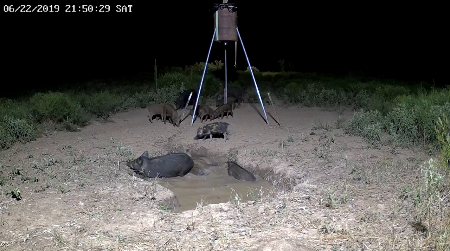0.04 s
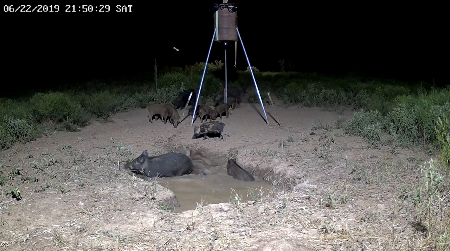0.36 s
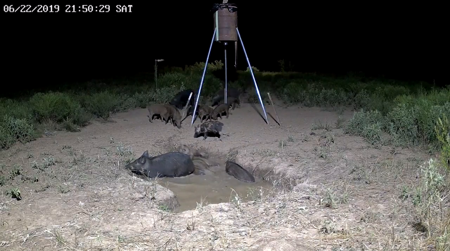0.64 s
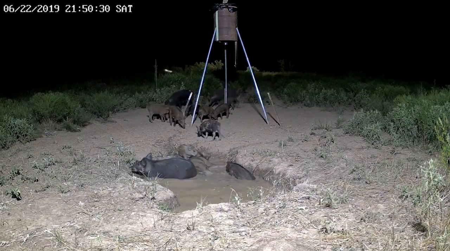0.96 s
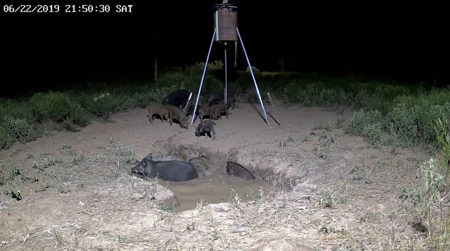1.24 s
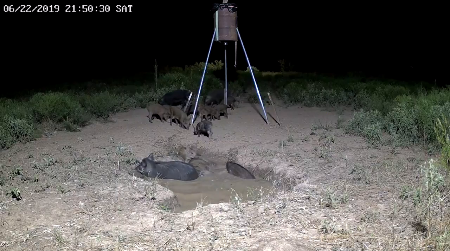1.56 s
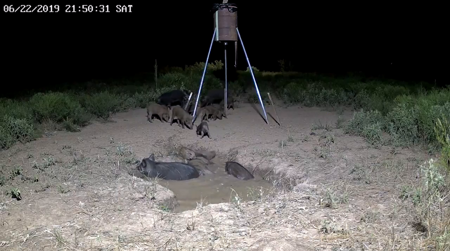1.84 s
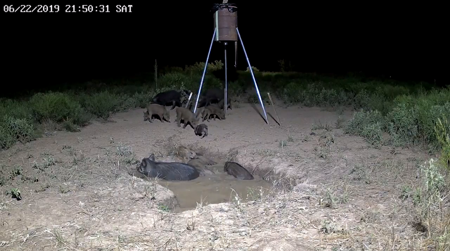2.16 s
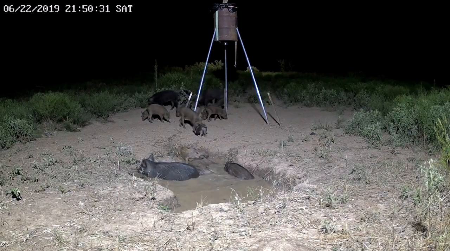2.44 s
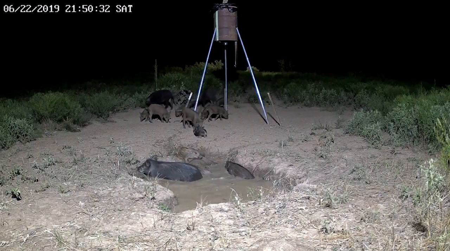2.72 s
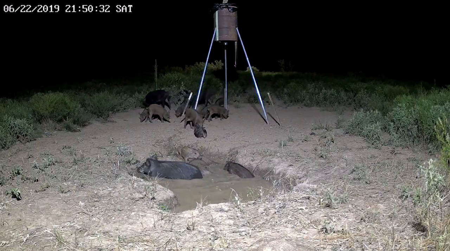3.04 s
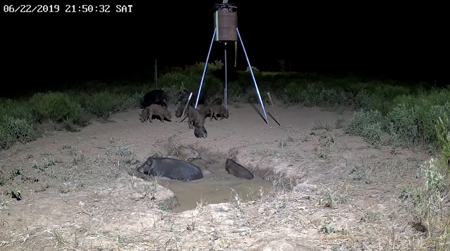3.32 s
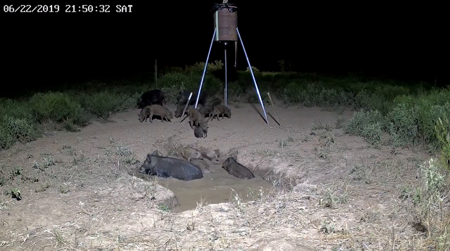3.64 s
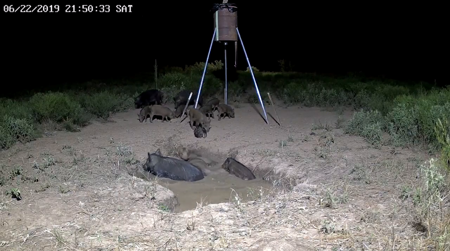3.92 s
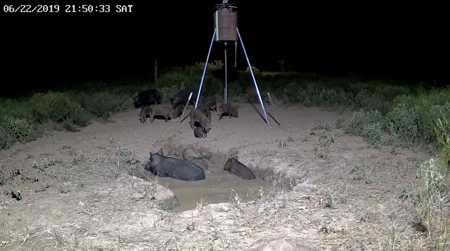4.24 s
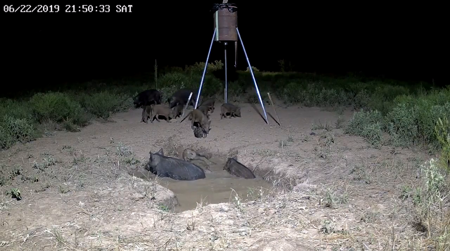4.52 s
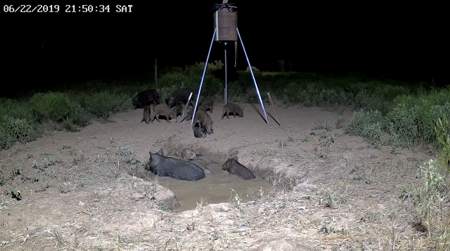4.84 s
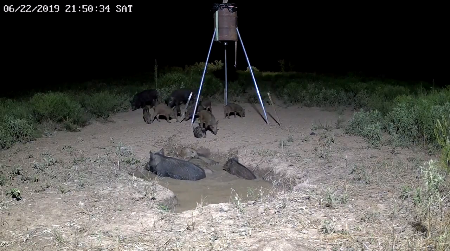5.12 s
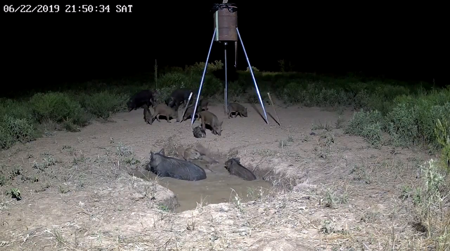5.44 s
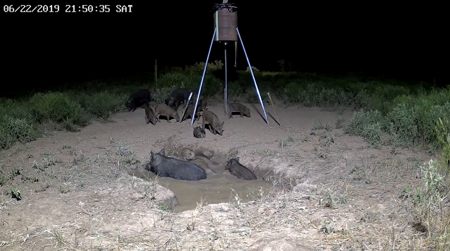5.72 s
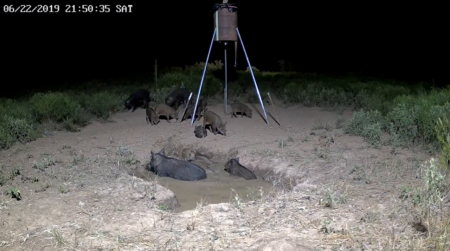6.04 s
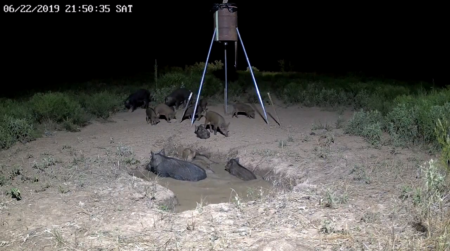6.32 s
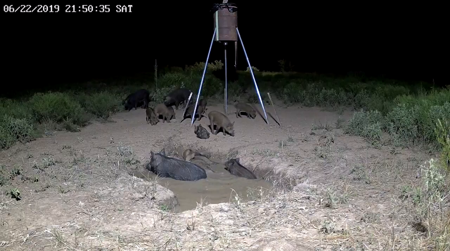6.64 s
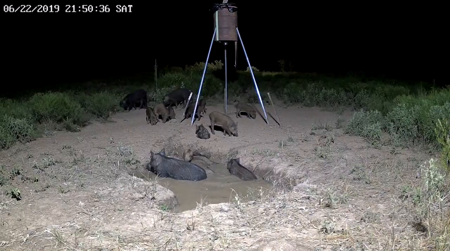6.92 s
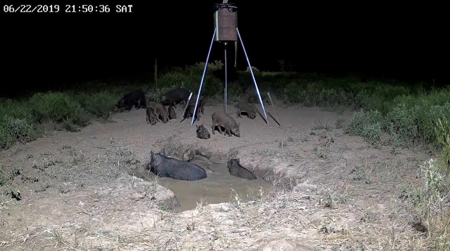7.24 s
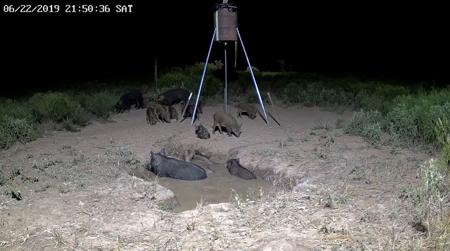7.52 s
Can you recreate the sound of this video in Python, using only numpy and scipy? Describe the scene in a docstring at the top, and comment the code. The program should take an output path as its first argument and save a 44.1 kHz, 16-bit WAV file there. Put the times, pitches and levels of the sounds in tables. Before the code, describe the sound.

Over a faint, steady hiss of night insects, wild pigs bump and scuff on the ground and grunt softly. A pig then shifts in a mud hole, making squelches, bubbles and two short bouts of splashing, as feed snaps between teeth and light gusts buffet the small outdoor microphone. Things settle, and a clearer low grunt is followed by a softer one.

```python
"""Under a feeder at night, wild pigs feed and wallow, heard by a small outdoor camera.
Insects hiss all round; puffs of breeze stir the brush and buffet the microphone.
Snouts and hooves knock, feed cracks between teeth, and grunts pulse through ringing throats.
In the mud hole, air pockets squelch and bubble, and thrown water falls back as drops and fizz."""
import sys
import numpy as np
from scipy import signal
from scipy.fft import rfft, irfft
from scipy.io import wavfile
from scipy.ndimage import uniform_filter1d

SR = 44100
rng = np.random.default_rng(int(sys.argv[2]) if len(sys.argv) > 2 else 0)


def transcribe(u):
    """Save the signal u as a 16-bit wav file named by the first command-line argument.

    u: samples, shape (n,) or (channels, n), limited to [-1, 1]; the rate is SR.
    q: integer samples, one column per channel.
    """
    v = np.clip(np.atleast_2d(u).T, -1, 1)
    q = np.round(v * 32767).astype(np.int16)
    wavfile.write(sys.argv[1], SR, q)


N = 342657
TIME = np.arange(N) / SR
LEAD_S = .03  # margin round each short sound


def from_db(db):
    return 10 ** (np.asarray(db) / 20)


def unit_rms(x):
    return x / np.sqrt(np.mean(x ** 2) + 1e-20)


def add(mix, start_s, sound):
    """Mixes a sound in at start_s."""
    part = mix[max(round(start_s * SR), 0):][:len(sound)]
    part += sound[:len(part)]


def colour(x, eq):
    """Shapes x with an EQ of (freq_hz, gain_db) points, at rms 1."""
    hz, db = np.transpose(eq)
    bins = np.fft.rfftfreq(len(x), 1 / SR) + 1
    octaves_outside = np.maximum(np.log2(bins / hz[-1]), 0) + np.maximum(np.log2(hz[0] / bins), 0)
    gain_db = np.interp(np.log(bins), np.log(hz), db) - 30 * octaves_outside
    return unit_rms(irfft(rfft(x) * from_db(gain_db), len(x)))


def butterworth(x, order, hz, kind):
    return signal.sosfilt(signal.butter(order, hz, kind, fs=SR, output="sos"), x)


def drift(per_s):
    """Slow random wander of rms 1."""
    knots = rng.standard_normal(4000)
    return unit_rms(np.interp(TIME * per_s, np.arange(len(knots)), knots))


def grains(per_s, spread_db):
    """Random tiny impacts of uneven size."""
    impacts = rng.standard_normal(N) * (rng.random(N) < per_s / SR)
    return impacts * from_db(spread_db * np.minimum(rng.exponential(1, N), 3.5))


def swell_db(start_s, hold_s, rise_s, fall_s):
    """Attack, hold and release, topping out at 0 dB; rise and fall are the times taken for 20 dB."""
    before, after = np.maximum(start_s - TIME, 0), np.maximum(TIME - start_s - hold_s, 0)
    return -20 * (before / rise_s + after / fall_s)


def power_sum(curves_db):
    """Gain of several dB curves whose powers add."""
    return np.sqrt(sum(from_db(db) ** 2 for db in curves_db))


def turbulence(eq):
    """Low noise whose own swells are levelled."""
    swirl = signal.hilbert(colour(rng.standard_normal(N), eq))
    envelope = np.sqrt(uniform_filter1d(abs(swirl) ** 2, 2200) + 1e-9)
    return unit_rms(swirl.real / envelope)


# sub rumble of slow air: freq_hz, gain_db
CALM_EQ = [(8, 15), (25, 0.5), (60, -10), (110, -19.5), (200, -40)]
# flutter of gusting air: freq_hz, gain_db
GUST_EQ = [(20, -16), (56, 5), (85, -8), (120, -11.5), (170, -23.5), (300, -35.5)]
# puffs of breeze on microphone and brush: peak_s, rumble_db, rise_s, fall_s, hiss_db
GUSTS = [(0.42, -60, 0.54, 0.25, -60.5), (1.032, -47.5, 0.36, 0.18, -58.5), (2.65, -46, 0.13, 0.31, -58),
         (3.379, -35.5, 0.081, 0.69, -52), (4.002, -30, 0.15, 0.23, -54.5), (4.503, -54.5, 0.71, 1, -72.5),
         (5.099, -30, 0.19, 0.13, -53), (5.482, -35, 0.2, 0.36, -54.5), (5.719, -39.5, 0.1, 0.25, -57),
         (7.552, -41, 0.27, 0.52, -57)]
# the hardest eddies: middle_s, level_db, half_length_s, flutter_hz
EDDIES = [(0.887, -34, 0.007, 58), (2.629, -30, 0.0086, 57.5), (3.33, -33.5, 0.0092, 61.5),
          (3.368, -35, 0.0078, 69), (3.426, -25.5, 0.0082, 74), (3.488, -29, 0.0081, 59),
          (3.62, -31, 0.02, 57), (3.838, -31, 0.017, 54), (3.981, -16, 0.0063, 64.5),
          (4.924, -30, 0.0047, 61.6), (5.055, -20.5, 0.0042, 89.6), (5.076, -16, 0.012, 57.4),
          (5.151, -25.5, 0.014, 51), (5.648, -28, 0.0084, 56), (5.74, -21, 0.0075, 61)]
def wind(still_db=-65.5, crossover_db=-50, slowing_per_s=7):
    """Slow air sways the diaphragm; gusts flutter faster, and single eddies slow as they pass."""
    puffs = [db + swell_db(s, 0, rise, fall) for s, db, rise, fall, _ in GUSTS]
    strength = power_sum([still_db] + puffs)
    gusty = strength / (strength + from_db(crossover_db))
    out = strength * (gusty * turbulence(GUST_EQ) + from_db(7) * (1 - gusty) * turbulence(CALM_EQ))
    t = np.arange(-2500, 2500) / SR
    for s, db, half_s, hz in EDDIES:
        envelope = from_db(db) * np.exp(-.5 * (t / half_s) ** 2)
        cycles = hz * t * (1 - slowing_per_s * t / 2) + rng.random()
        add(out, s + t[0], envelope * np.sin(2 * np.pi * cycles))
    return out


# airy bed of brush and far insects: freq_hz, gain_db
HISS_EQ = [(150, -5.5), (500, -8.5), (900, -25), (1200, -21), (1650, -7), (2550, 0.5), (2900, -1.5),
           (3700, -3.5), (4100, 1.5), (5300, -0.5), (6200, -8), (7100, -17.5), (8000, -38)]
# insect chorus bands: centre_hz, half_width_hz, relative_db
INSECT_BANDS = [(3196, 170, -8.5), (4344, 190, -8.5), (4380, 82, -13.5)]
def brush_and_insects(still_db=-65.5, lag_s=.034, follow=.37, flicker_db=2):
    """Wide hiss with narrow chorus bands standing out of it; both swell just after each of the GUSTS."""
    stirred = [db + follow * swell_db(s + lag_s, 0, rise, fall) for s, _, rise, fall, db in GUSTS]
    bed_db = 20 * np.log10(power_sum([still_db] + stirred))
    out = from_db(bed_db - 2.25 + flicker_db * drift(40)) * colour(rng.standard_normal(N), HISS_EQ)
    bins = np.fft.rfftfreq(N, 1 / SR)
    for hz, half_width, band_db in INSECT_BANDS:
        band = irfft(rfft(rng.standard_normal(N)) / (1 + ((bins - hz) / half_width) ** 2), N)
        out += from_db(bed_db + band_db) * unit_rms(band)
    return out


def shuffling():
    """The herd shifts about: faint, dull noise that wavers in level."""
    level = from_db(-86 + 3.5 * drift(9))
    return level * colour(rng.standard_normal(N), [(200, 1), (950, 2.5), (1250, -19.5)])


# dark tone of thick mud: freq_hz, gain_db
MUD_EQ = [(150, -19), (260, -3.5), (450, -4), (780, -6.5), (1000, -17), (1800, -19.5)]
def squelch(pops_per_s=160, ring_cycles=2.8):
    """Tiny air pockets of many sizes pop in wet mud, ring briefly and run together into a gurgle."""
    t = np.arange(3500) / SR
    gurgle = 0
    for hz in np.geomspace(200, 2300, 17):
        age = t * hz / ring_cycles
        pop = hz * age * np.exp(-2 * age) * np.sin(2 * np.pi * hz * t)
        gurgle = gurgle + signal.oaconvolve(grains(pops_per_s, spread_db=2), pop)[:N]
    return colour(gurgle, MUD_EQ)


# bright edge of sticky mud and of scraped grit: freq_hz, gain_db
EDGE_EQ = [(900, -31.5), (1300, -2), (1550, 3.5), (2200, -1.5), (2700, -9), (4300, -15.5), (5500, -39)]
# shoves of wet ground: start_s, hold_s, level_db
SLOSHES = [(0.018, 0.12, -54.5), (0.211, 0.012, -53.5), (0.337, 0.16, -51), (2.326, 0.053, -65),
           (3.46, 0.057, -55.5), (3.571, 0.18, -63), (3.946, 0.062, -48), (4.149, 0.064, -42),
           (5.421, 0.056, -49), (5.474, 0.056, -44.5), (5.672, 0.069, -53.5)]
def sloshes(rise_s=.058, fall_s=.13, sticky_db=-11):
    """Mud pushed by snouts and bodies squelches, and crackles as it pulls apart."""
    envelope = power_sum(db + swell_db(s, hold, rise_s, fall_s) for s, hold, db in SLOSHES)
    gurgle = squelch()
    crackle = from_db(sticky_db) * colour(grains(per_s=700, spread_db=2.5), EDGE_EQ)
    return from_db(-4) * envelope * (gurgle + crackle)


# low scuff of a blow: freq_hz, gain_db
SCUFF_EQ = [(70, -19), (160, 7), (260, -1), (520, -3), (800, -8.5), (1000, -10.5), (1200, -40),
            (2000, -59.5)]
# dull knocks of snouts and hooves: hit_s, level_db, pitch_hz, swell_s, edge_db
KNOCKS = [(0.044, -42.5, 288, 0.0071, -22), (0.079, -38, 322, 0.0048, -31), (0.102, -39, 344, 0.0046, -16),
          (0.111, -31.5, 237, 0.002, -42), (0.127, -44, 384, 0.005, -8), (0.2134, -35, 250, 0.0028, -10.5),
          (0.222, -35.5, 618, 0.0043, -8.5), (0.23, -38.5, 290, 0.0027, -6), (0.327, -33, 226, 0.0033, -22),
          (0.379, -34, 288, 0.0036, -15.5), (0.382, -33.5, 251, .009, -33), (0.421, -50, 810, 0.0046, -11),
          (0.434, -44.5, 417, 0.014, -5), (0.469, -33, 494, 0.0046, -5), (0.468, -40.5, 109, 0.0086, -35),
          (0.506, -38.5, 297, 0.0036, -24), (0.588, -49, 267, 0.0077, 1), (0.703, -35, 456, 0.0036, -14),
          (0.7116, -29, 262, 0.0048, -10), (0.7144, -30, 704, 0.0042, -6.5),
          (0.737, -39.5, 423, 0.0025, -15), (1.872, -46, 482, 0.0036, -35), (2.142, -35.5, 522, 0.0027, -9),
          (2.336, -47, 697, 0.0068, -17), (2.356, -45.5, 514, 0.004, -23), (4.162, -36.5, 620, 0.0045, 0),
          (4.166, -19, 340, 0.0021, -11), (4.2264, -37, 547, 0.0024, -33), (7.51, -50, 280, 0.006, -35)]
def knock(db, hz, swell_s, edge_db, body_hz=230, body_decay_s=.013, thud_hz=97):
    """A soft blow rings a hollow body and thuds on the ground; grit scrapes as it lands and after."""
    t = np.arange(7000) / SR - LEAD_S
    since = np.maximum(t, 0)
    age = since / swell_s
    blow = (age * np.exp(1 - age)) ** 2
    tone = blow * np.sin(2 * np.pi * hz * t)
    fade_in = np.minimum(2 + 2 * t / LEAD_S, 1)
    scrape = from_db(-15) * np.exp(np.minimum(t / .028, -t / .034)) * fade_in
    low, high = rng.standard_normal((2, len(t)))
    low = butterworth(low, 2, .63 * hz, "high")  # light blows carry little bass
    grit = .4 * colour(low, SCUFF_EQ) + .58 * from_db(edge_db) * colour(high, EDGE_EQ)
    ring_hz = body_hz * np.exp(.05 * rng.standard_normal())
    ring_envelope = from_db(-11.5) * (1 - np.exp(-age ** 2)) * np.exp(-since / body_decay_s)
    ring = ring_envelope * np.sin(2 * np.pi * ring_hz * t)
    thud = .43 * np.sin(2 * np.pi * thud_hz * since) * np.exp(-since * thud_hz)
    weight = min(body_hz / hz, 1) ** 2
    return from_db(db - 3) * (tone + weight * (ring + thud) + grit * (blow + scrape))


# sharp cracks and smacks, then two bright clicks in the loud grunt: hit_s, level_db, pitch_hz, snap_s
CRACKS = [(0.103, -48, 1460, 0.0059), (0.26, -47, 1780, .002), (0.267, -33, 1820, 0.00088),
          (0.4398, -40, 2100, 0.0011), (1.791, -48, 1770, 0.00094), (2.147, -40, 1850, 0.0017),
          (2.153, -34, 3080, 0.00034), (2.157, -47.5, 4220, 0.0019), (3.836, -26.5, 2470, 0.00059),
          (4.0531, -29, 2570, 0.00094), (4.125, -31.5, 2500, 0.0012), (4.1355, -34, 1850, 0.0014),
          (4.1692, -31, 1840, .0012), (4.3248, -18, 1850, 0.00074), (4.3273, -30, 2460, 0.0014),
          (5.754, -37.5, 2240, 0.00077), (5.993, -49, 1850, 0.0011), (7.081, -48.5, 1654, 0.0023),
          (7.134, -39, 2500, 0.00061)]
def crack(db, hz, snap_s, rise_s=.006, fall_s=.012, grains_per_s=1500):
    """A bright snap rings for a few cycles inside a brief, fine crackle, with no bass."""
    t = np.arange(5000) / SR - LEAD_S
    age = np.maximum(t, 0) / snap_s
    snap = (age * np.exp(1 - age)) ** 2 * np.sin(2 * np.pi * hz * t)
    since_snap = t - 2 * snap_s
    specks = rng.standard_normal(len(t)) * (rng.random(len(t)) < grains_per_s / SR)
    specks = colour(specks, [(1500, -2.5), (2650, 2), (3200, -18.5)])
    crackle = specks * np.exp(np.minimum(since_snap / rise_s, -since_snap / fall_s))
    return from_db(db) * butterworth(snap + from_db(-21) * crackle, 6, 1300, "high")


# small flings of wet mud: middle_s, level_db, centre_hz, length_s
SPLATS = [(0.928, -61.5, 1700, 0.055), (2.228, -66.5, 965, 0.086), (3.388, -55, 1980, 0.19),
          (3.863, -47.5, 2730, 0.039), (3.916, -53, 750, 0.039), (3.922, -46.5, 3700, 0.029),
          (3.989, -39, 730, 0.018), (4.172, -50.5, 4620, 0.068), (5.51, -43.5, 3600, 0.048),
          (5.567, -50, 5450, 0.11), (5.835, -56.5, 617, 0.066)]
def splat(db, hz, length_s):
    """Fine droplets land in a short swell of noise round one pitch."""
    size = round(length_s * SR)
    eq = [(hz / 2, -26), (hz / 1.2, -4), (hz, 0), (hz * 1.3, -8)]
    return from_db(db) * colour(rng.standard_normal(size), eq) * np.hanning(size)


def resonate(x, hz, width_hz):
    """A resonance of gain 1 that follows the curve hz."""
    turn = np.exp(2j * np.pi * np.cumsum(hz) / SR)
    pole = np.exp(-np.pi * width_hz / SR)
    return 2 * (turn * signal.lfilter([1 - pole], [1, -pole], x / turn)).real


# throat resonances: centre_hz, width_hz, gain_db, closing_fade_db
FORMANTS = [(76.5, 56, 7, -3), (169, 55, -1.5, -8.5), (270, 57, 9, 5.5), (486, 123, -6, 1),
            (807, 146, -2, 9.5)]
# low grunts: start_s, end_s, level_db, fall_db, flap_hz, cutoff_hz, jitter_ratio, attack_s
GRUNTS = [(1.488, 1.541, -69, -2, 102, 330, .2, 0.011), (2.478, 2.7, -49.5, 3, 81, 540, .25, 0.035),
          (3.208, 3.322, -48.5, 1.5, 73, 585, .25, 0.042), (7.0275, 7.218, -43, 1, 79.5, 960, .03, .003),
          (7.305, 7.526, -54.5, 8.5, 110, 650, .25, 0.047)]
def grunt(start_s, end_s, db, fall_db, flap_hz, cutoff_hz, jitter, attack_s,
          breath=.47, shimmer_db=2.5, release_s=.019, sag=.08):
    """Uneven flaps, each with a puff of air, ring the throat, which sinks and dulls as the mouth shuts."""
    t = np.arange(round((end_s - start_s + 2 * LEAD_S) * SR)) / SR
    progress = np.minimum(t / (end_s - start_s), 1)
    arch = np.sin(np.pi * progress)
    cycles = np.cumsum(flap_hz * np.exp(jitter * drift(70)[:len(t)])) / SR
    cycles += .08 * arch * drift(45)[:len(t)]  # single flaps come early or late
    flap = np.floor(cycles)
    effort = (1 + .5 * arch) * np.exp(-np.maximum(start_s + t - end_s, 0) / release_s)
    strength = effort * from_db(shimmer_db * arch * drift(82)[:len(t)] - fall_db * progress)
    pulses = np.diff(flap, prepend=-1) * strength
    since_flap = (cycles % 1) / flap_hz
    puffs = strength * np.exp(-since_flap / .007) * rng.standard_normal(len(t))
    drive = (1 - breath) * unit_rms(pulses) + breath * unit_rms(puffs)
    voice = 0
    for hz, width, gain_db, fade_db in FORMANTS:
        weak_flap = .65 / (1 + (hz / 420) ** 2)  # every other flap is softer and duller
        formant = drive * np.where(flap % 2, weak_flap, 1)
        for pass_width in (width, 4 * width):  # a sharp peak, then steep skirts
            formant = resonate(formant, hz * (1 + sag * (.5 - progress)), pass_width)
        voice = voice + from_db(gain_db - fade_db * progress) * formant
    voice = butterworth(voice, 16, cutoff_hz, "low")
    return from_db(db) * unit_rms(voice * np.minimum(t / attack_s, 1))


# bubbles in the mud: start_s, peak_db, start_hz, end_hz, length_s
BUBBLES = [(1.653, -57, 366, 433, 0.048), (2.863, -54, 950, 940, 0.027), (3.603, -50, 330, 700, 0.04),
           (3.677, -49.5, 450, 863, 0.031), (4.03, -27.5, 546, 610, 0.0091), (4.035, -35, 703, 790, 0.016),
           (4.308, -42, 845, 900, 0.015), (4.334, -42.5, 686, 810, 0.016), (5.654, -46.5, 507, 560, 0.016),
           (5.678, -50, 890, 910, 0.018), (5.713, -40.5, 570, 654, 0.019), (5.777, -52.5, 965, 970, 0.013),
           (6.561, -70.5, 516, 550, 0.073), (6.742, -68.5, 950, 980, 0.017)]
def bubble(db, start_hz, end_hz, length_s, wobble=.047, damping=3.6):
    """An air pocket swells and dies away, gliding in pitch as the mud opens or closes over it."""
    progress = np.linspace(0, 1, round(length_s * SR))
    glide_hz = start_hz * (end_hz / start_hz) ** progress
    hz = glide_hz * np.exp(wobble * drift(370)[:len(progress)])
    envelope = progress * (1 - progress) * np.exp(-damping * progress)
    return from_db(db) * envelope / envelope.max() * np.sin(2 * np.pi * np.cumsum(hz) / SR)


# patter of falling drops: freq_hz, gain_db
DROPS_EQ = [(700, -2), (1200, -12.5), (1750, 0), (2600, 0.5), (3100, 1), (4000, -24)]
# bright fizz of spray: freq_hz, gain_db
FIZZ_EQ = [(2500, -18.5), (3300, 7), (4400, 16.5), (5500, 6), (6500, 0.5), (8000, -57)]
# throws of water: start_s, hold_s, level_db, fizz_relative_db, rise_s
SPLASHES = [(3.984, 0.039, -44.5, 5.5, 0.072), (4.14, 0.043, -47, -2.5, 0.16),
            (5.486, 0.076, -43, 2.5, 0.04)]
def splashes(fall_s=.082):
    """Water thrown up by a wallowing pig falls back as drops and fizz."""
    drops_db, fizz_db = [], []
    for s, hold_s, db, relative_db, rise_s in SPLASHES:
        spray_db = db + swell_db(s, hold_s, rise_s, fall_s)
        drops_db.append(spray_db)
        fizz_db.append(spray_db + relative_db)
    drops = power_sum(drops_db) * colour(grains(per_s=8000, spread_db=3), DROPS_EQ)
    fizz = power_sum(fizz_db) * colour(grains(per_s=9700, spread_db=-4), FIZZ_EQ)
    return from_db(1.5) * drops + from_db(-3.5) * fizz


def dull_click(peak_db, cutoff_hz, decay_s=.0053):
    """A single soft, dull click: one low-passed pulse that does not ring."""
    pulse = butterworth(np.exp(-np.arange(1500) / SR / decay_s), 6, cutoff_hz, "low")
    return from_db(peak_db) * pulse / pulse.max()


def clearing(x, wet_db=-17, t60_s=.2):
    """Weak scatter from the ground and the bushes."""
    t = np.arange(12000) / SR
    echoes = rng.standard_normal(len(t)) * (rng.random(len(t)) < .05)
    echoes *= from_db(-60 * t / t60_s) * (t > .004)
    return x + from_db(wet_db) * signal.fftconvolve(x, echoes / np.linalg.norm(echoes))[:N]


def scene():
    """Pigs and mud hole in the clearing, over the night hiss and the wind, in mono."""
    pigs = shuffling()
    for s, *row in GRUNTS:
        add(pigs, s, grunt(s, *row))
    for s, *row in KNOCKS:
        add(pigs, s - LEAD_S, knock(*row))
    for s, *row in CRACKS:
        add(pigs, s - LEAD_S, crack(*row))
    wallow = sloshes() + splashes()
    for s, *row in BUBBLES:
        add(wallow, s, bubble(*row))
    for s, db, hz, length_s in SPLATS:
        add(wallow, s - length_s / 2, splat(db, hz, length_s))
    foreground = pigs + wallow
    add(foreground, 4.9785, dull_click(peak_db=-31, cutoff_hz=1500))
    return (clearing(foreground) + brush_and_insects() + wind())[None]


def record(dry, cutoff_hz=8400):
    """The camera's band limit cuts the top treble."""
    low_pass = signal.firwin(401, cutoff_hz, window=("kaiser", 9), fs=SR)
    return signal.oaconvolve(dry, low_pass[None], "same")


dry = scene()
out = record(dry)
transcribe(out)
```